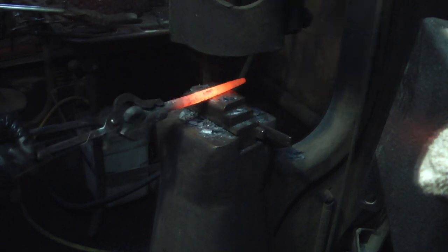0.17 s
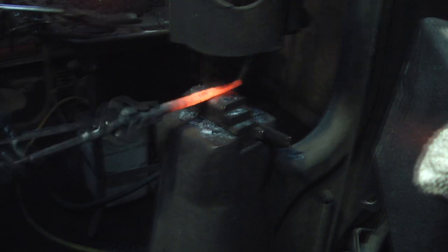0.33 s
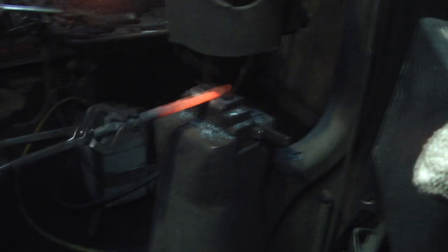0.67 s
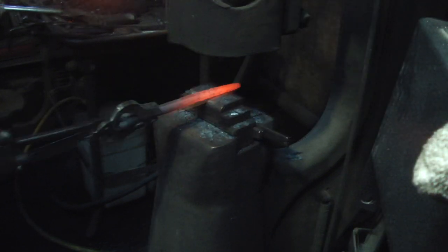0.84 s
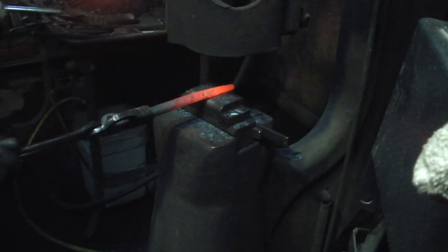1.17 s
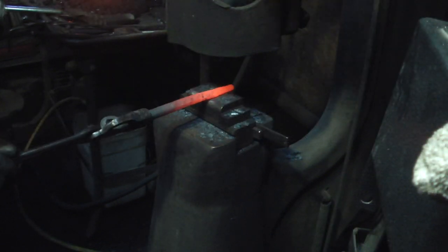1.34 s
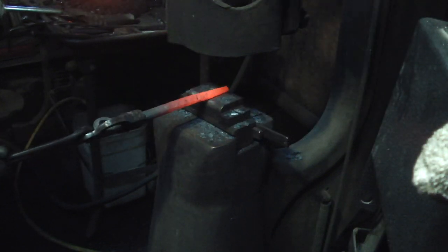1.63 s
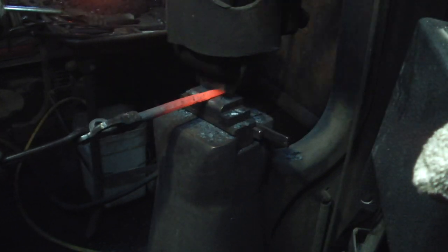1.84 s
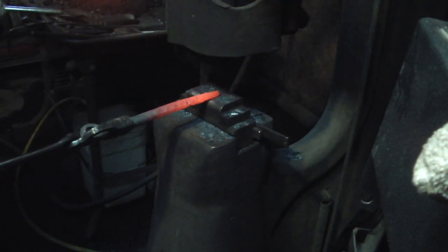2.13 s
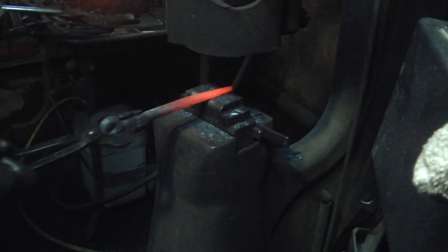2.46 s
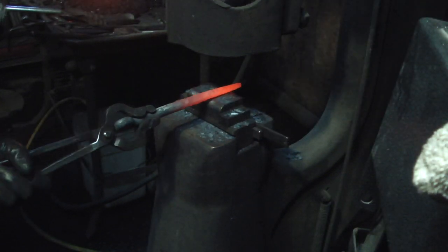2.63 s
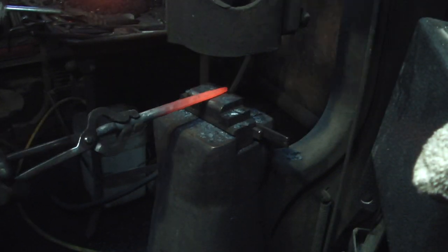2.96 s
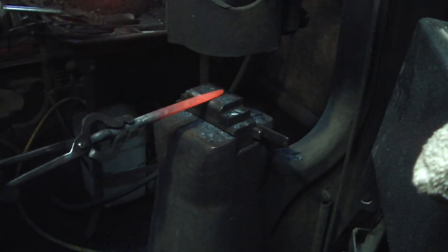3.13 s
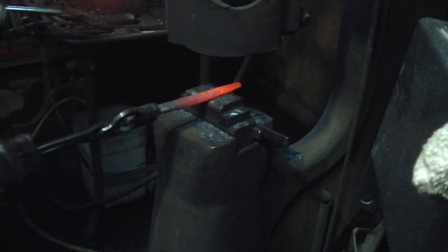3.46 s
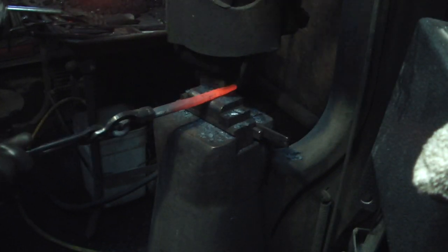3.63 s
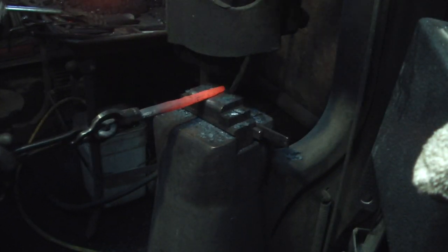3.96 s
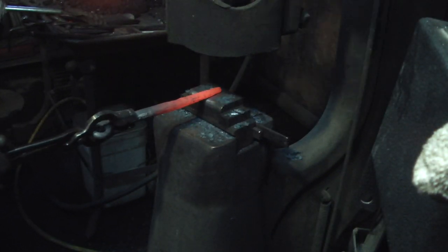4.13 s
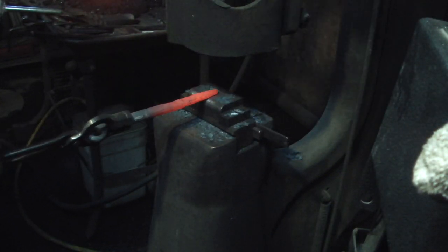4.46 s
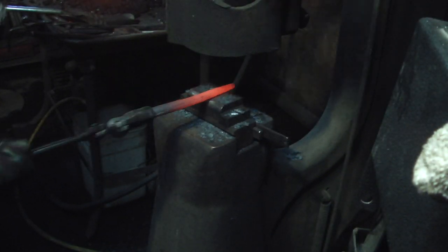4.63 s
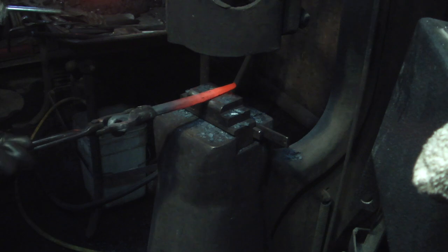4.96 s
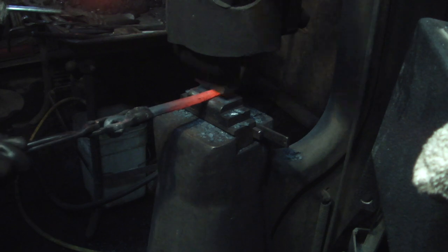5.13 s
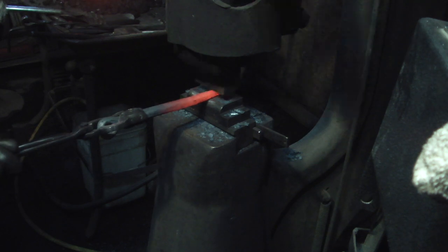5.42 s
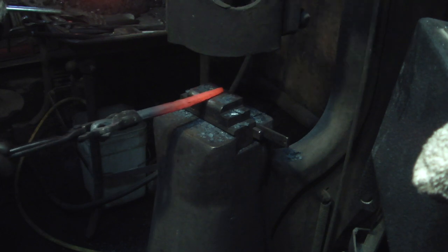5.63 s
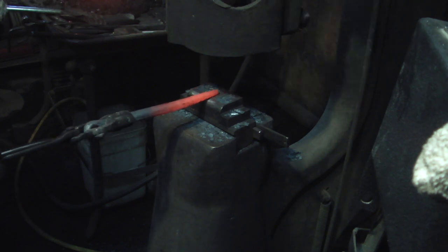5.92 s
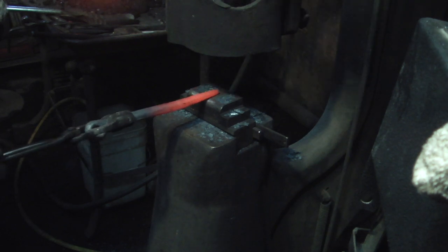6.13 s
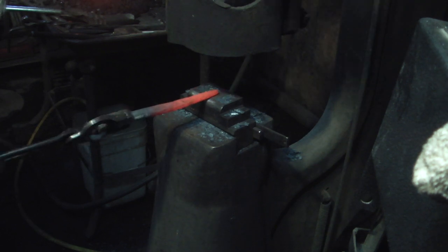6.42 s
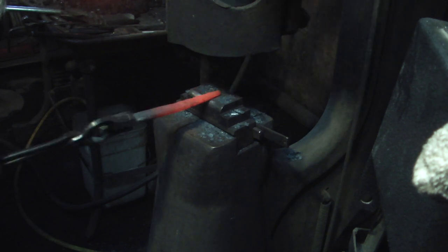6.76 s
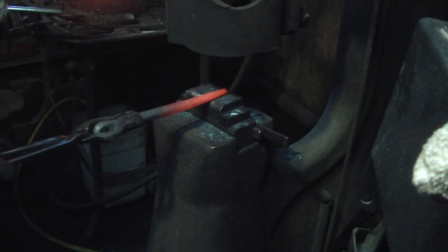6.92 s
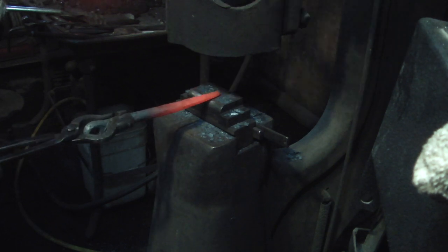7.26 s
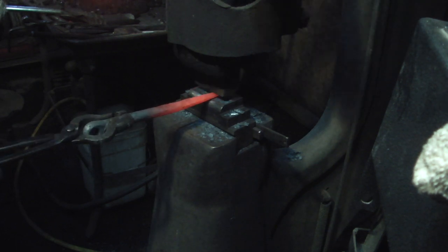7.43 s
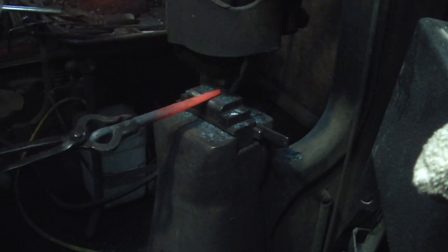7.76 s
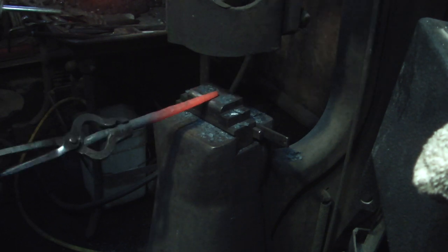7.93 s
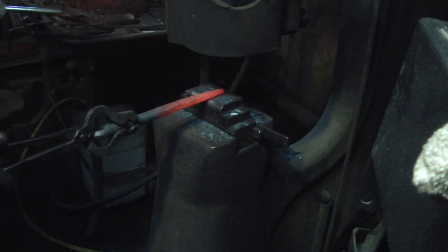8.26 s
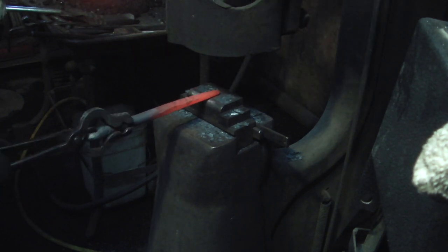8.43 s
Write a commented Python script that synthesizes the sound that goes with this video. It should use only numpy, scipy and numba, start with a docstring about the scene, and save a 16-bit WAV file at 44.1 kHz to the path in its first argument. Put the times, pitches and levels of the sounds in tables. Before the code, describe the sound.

A power hammer pounds hot steel in a fast, steady run of heavy metallic blows, loose parts clanking and rattling between them in a workshop.

```python
"""Power hammer in a workshop

A power hammer forges a hot steel bar, heard close by through a small camera's two microphone ports.
Each blow is a crack, then boom, clang and hiss shaped from noise, with a pressure pulse, wall echoes and a slab swing.
Between blows resonant noise and short sines make the clanks of loose dies, linkage and tongs; small ticks rattle.
Steady coloured noise is the workshop. A fast limiter flattens the first part of every blow.
"""
import sys
import numpy as np
from scipy import signal
from scipy.fft import rfft, irfft, next_fast_len
from scipy.io import wavfile
from scipy.ndimage import uniform_filter1d, map_coordinates
from numba import njit

SR = 44100
rng = np.random.default_rng(int(sys.argv[2]) if len(sys.argv) > 2 else 0)


def to_wav(s):
    """Save 16-bit WAV."""
    ch = np.atleast_2d(s).T  # columns
    pcm = np.round(np.clip(ch, -1, 1) * 32767)  # PCM
    wavfile.write(sys.argv[1], SR, pcm.astype(np.int16))


N = 378819


def amp(db):
    """Decibel law: the amplitude gain of a level in dB."""
    return 10 ** (np.asarray(db) / 20)


def unit(x):
    """Normalisation: the signal scaled to rms 1."""
    return x / np.sqrt(np.mean(x ** 2) + 1e-20)


def along(points, hz):
    """Spectral envelope: (Hz, value) points interpolated on a logarithmic frequency axis."""
    point_hz, value = np.transpose(points)
    return np.interp(np.log(hz + 1), np.log(point_hz + 1), value)


def peak(hz, centre_hz, width_hz):
    """Resonance curve: the gain of one mode, 1 at its centre."""
    return 1 / np.sqrt(1 + (2 * (hz - centre_hz) / width_hz) ** 2)


def fading(t, t60, rise=0.00049):
    """Exponential damping: 60 dB of decay in t60 seconds, after a short rise (time constant in s)."""
    return amp(-60 * t / t60) * (1 - np.exp(-t / rise))


def shaped_noise(size, gain):
    """Filtered noise: fresh white noise multiplied by a spectral gain."""
    return irfft(rfft(rng.standard_normal(size)) * gain, size)


def chatter(size, depth_db):
    """Repeated impact: bouncing parts give an uneven level, with about a hundred lumps a second."""
    knots = rng.standard_normal(size=64)
    return amp(depth_db * map_coordinates(knots, [np.arange(size) * 110 / SR], mode="mirror"))


def bands(size, gain, low_hz, high_hz):
    """Broadband excitation: noise with random spectral humps, split into low, middle and high parts of rms 1."""
    hz = np.fft.rfftfreq(size, 1 / SR)
    low = 1 / (1 + (hz / low_hz) ** 4)
    high = 1 / (1 + (high_hz / (hz + 1)) ** 6)
    middle = (1 - low) * (1 - high)
    humps = np.interp(np.sqrt(hz / hz[-1]), np.linspace(0, 1, num=40), rng.standard_normal(size=40))
    spectrum = rfft(rng.standard_normal(size)) * gain(hz) * amp(1.72 * humps)
    return [unit(irfft(spectrum * part, size) * chatter(size, depth_db=2.0)) for part in (low, middle, high)]


# Steady workshop spectrum of motor, forge and lingering echo: frequency_hz [Hz], density_db [relative dB per Hz]
SHOP_SPECTRUM = [(15, -61), (25, -19), (217, 7), (545, 1), (962, 7.5), (2410, 9), (3720, 3.5), (4490, 2),
                 (5280, 1), (12500, -7.5), (16000, -97)]


def shop():
    """Stationary noise: a fixed spectral envelope gives the steady background of the workshop."""
    size = next_fast_len(N)
    hz = np.fft.rfftfreq(size, 1 / SR)
    noise = shaped_noise(size, amp(along(SHOP_SPECTRUM, hz)))[:N]
    return amp(-39) * unit(noise)


def rattle(machine, count=1800):
    """Driven vibration: small ticks of shaken metal and scale follow the machine's momentary rms."""
    when, pitch, strength, phase = rng.random((count, 4)).T[:, :, None]
    start, step = (when * N).astype(int), np.arange(300)
    shake = np.sqrt(np.abs(uniform_filter1d(machine ** 2, size=400)))[start]
    cycles = 1500 * 8.5 ** pitch * step / SR  # pitches from 1500 to 12750 Hz
    envelope = amp(-60 * cycles / 22) * (1 - np.exp(-cycles))  # 60 dB of decay in 22 cycles
    ticks = shake * amp(-8.0 + 18.8 * strength) * envelope * np.sin(2 * np.pi * (cycles + phase))
    return np.bincount((start + step).ravel(), ticks.ravel(), N + 300)[:N]


# Resonances of frame and room: centre_hz [Hz], width_hz [Hz], level_db [mean dB]
FRAME_MODES = [(319.4, 7.6, 9), (432, 8.7, 2), (480, 21, -1), (949, 44, 2.5), (1179, 10.2, 7),
               (1438, 31, 0), (1711, 76, -0.5), (2040, 16, 4), (2334, 25.6, 7.5), (2477, 28, -1),
               (2570, 26, 2), (3226, 99, -3.5)]


def frame(hz):
    """Modal resonance: the frame lifts its modes out of any contact, each time in new proportions."""
    return 1 + sum(amp(db + rng.normal(0, 4.0)) * peak(hz, centre, width) ** 2
                   for centre, width, db in FRAME_MODES)


# Rough modes of the loose die: centre_hz [Hz], width_hz [Hz], level_db [mean relative dB]
DIE_MODES = [(3392, 81, -7), (4200, 500, -12), (4484, 36, 3.5), (4620, 420, -7.5), (12430, 350, -20)]


def die(size):
    """Modal ringing: the loose die chatters in rough modes of new strength and pitch at every contact; rms 1."""
    hz = np.fft.rfftfreq(size, 1 / SR) * rng.normal(1, .008)
    modes = sum(amp(db + rng.normal(0, 3)) * peak(hz, centre, width) ** 2 for centre, width, db in DIE_MODES)
    return unit(shaped_noise(size, modes))


# Clanks of linkage and tongs: start_s [s], level_db [relative dB], pitch_hz [Hz]
CLANK_EVENTS = [(0.038, -24.5, 3500), (0.0998, -25, 9150), (0.107, -27, 4500), (0.1316, -27, 9300),
                (0.197, -28, 5000), (0.2039, -18.5, 12300), (0.293, -29, 8800), (0.3345, -30, 9600),
                (0.3663, -25.5, 2470), (0.389, -22, 3930), (0.418, -27, 7200), (0.4292, -28.5, 10800),
                (0.522, -36, 9000), (0.5646, -30.5, 9700), (0.577, -30, 8000), (0.641, -26.5, 5000),
                (0.6605, -28.5, 11350), (0.6855, -22, 3800), (0.873, -26.5, 11260), (0.896, -19, 4060),
                (0.932, -23, 4850), (0.992, -27.5, 8400), (1.006, -18.5, 4430), (1.1866, -27, 11300),
                (1.1998, -33, 7670), (1.216, -18, 4050), (1.243, -28, 2340), (1.2473, -21, 5000),
                (1.298, -20, 6200), (1.4687, -15, 4170), (1.52, -25, 7870), (1.559, -28, 8100),
                (1.575, -20.5, 1560), (1.599, -25.5, 9500), (1.75, -18, 3740), (1.737, -37, 9000),
                (1.788, -20.5, 4900), (1.8228, -27, 5700), (1.8457, -30, 9600), (2.0162, -23.5, 11100),
                (2.0555, -15.5, 4200), (2.1083, -23, 2270), (2.1293, -24, 7760), (2.2878, -16.5, 2450),
                (2.321, -26, 2660), (2.351, -23.5, 2600), (2.3967, -20, 4200), (2.4124, -17, 3380),
                (2.5848, -15, 4840), (2.644, -24, 2400), (2.659, -35, 8900), (2.7319, -20, 2620),
                (2.8872, -30, 6160), (2.9248, -21.5, 5000), (2.9584, -29, 8030), (2.977, -25, 5070),
                (3.0308, -31.5, 8500), (3.0552, -23.5, 2380), (3.1068, -19, 4700), (3.156, -29, 7870),
                (3.2304, -28.5, 9400), (3.2653, -18, 4060), (3.314, -16, 4040), (3.3403, -18.5, 3320),
                (3.3842, -19.5, 2540), (3.4949, -28, 9000), (3.5174, -21, 4030), (3.537, -23, 10300),
                (3.575, -18.5, 2420), (3.6404, -20, 3000), (3.66, -26, 3500), (3.8048, -17.5, 4870),
                (3.848, -20.5, 4930), (3.8662, -38, 7760), (3.9421, -19.5, 6100), (4.115, -27, 4600),
                (4.165, -28, 9000), (4.2334, -20, 3320), (4.2532, -19.5, 4800), (4.348, -29, 4800),
                (4.428, -18, 4200), (4.4668, -26, 8100), (4.4835, -24.5, 3340), (4.5439, -26, 2950),
                (4.703, -26.5, 7000), (4.7714, -26, 7900), (4.8064, -28, 4900), (4.845, -32, 8900),
                (4.8702, -24, 3400), (4.9443, -24, 2610), (4.9644, -25, 2600), (5.0535, -25, 11090),
                (5.07, -21.5, 4000), (5.1142, -27, 1870), (5.1507, -26, 7000), (5.157, -22, 9500),
                (5.3272, -17, 3340), (5.378, -29.5, 8300), (5.4415, -28, 6330), (5.4488, -22, 3940),
                (5.4562, -24.5, 8100), (5.616, -31, 10000), (5.623, -19.5, 4620), (5.677, -30.5, 8450),
                (5.754, -27, 7850), (5.8123, -29, 2506), (5.9668, -28, 11500), (5.979, -17.5, 4070),
                (5.9958, -18.5, 3970), (6.0177, -28, 4930), (6.0566, -25, 7800), (6.077, -29, 9700),
                (6.119, -23, 5970), (6.2495, -26, 8870), (6.2858, -18, 4340), (6.3445, -32, 10000),
                (6.3606, -27, 10200), (6.394, -24, 3000), (6.5092, -32.5, 9000), (6.5301, -28, 2160),
                (6.585, -30.5, 7900), (6.6585, -22.5, 4700), (6.7267, -24, 2370), (6.7397, -27, 7500),
                (6.7871, -17, 4900), (6.8948, -23.5, 4300), (6.9646, -30.5, 8100), (6.928, -33, 3000),
                (7.0003, -33, 5000), (7.034, -26, 4000), (7.112, -31, 2370), (7.1169, -19.5, 2450),
                (7.1833, -24, 3020), (7.2955, -28, 11400), (7.3368, -28, 8140), (7.3513, -29, 3480),
                (7.4154, -34, 8300), (7.4267, -28, 3600), (7.4454, -27.5, 2410), (7.5243, -27, 4500),
                (7.6273, -27.5, 10000), (7.637, -20.5, 4000), (7.687, -22, 5040), (7.717, -29.5, 8000),
                (7.789, -23, 3500), (7.8786, -28, 6960), (7.9258, -26, 9200), (7.941, -16, 3740),
                (7.987, -24, 3500), (8.022, -29, 7940), (8.03, -26.5, 10100), (8.035, -22.5, 2960),
                (8.1979, -21, 11840), (8.2514, -22, 1550), (8.326, -20, 2340), (8.3965, -20, 1487),
                (8.4144, -21.5, 3300), (8.487, -31, 9200), (8.5105, -22.5, 4840), (8.549, -30, 8900)]
# The loose die drops back on its seat, about 0.1 s after a blow: start_s [s], level_db [relative dB]
DIE_DROPS = [(0.0747, -33), (0.2932, -28.5), (0.5518, -31), (0.871, -26.5), (1.1618, -26), (1.454, -23),
             (1.7358, -26), (1.9834, -23), (2.2682, -22.5), (2.5662, -23.5), (2.9012, -26.5), (3.2293, -31),
             (3.4938, -24.5), (3.7832, -22), (4.097, -21), (4.407, -25.5), (4.7866, -20.5), (5.0265, -26.5),
             (5.3056, -24), (5.5972, -26), (6.2239, -23), (6.5093, -31), (6.8764, -27), (7.2728, -23.5),
             (7.6261, -29.5), (7.8954, -29.5), (8.1797, -26), (8.4858, -22.5)]
# Noise spectrum of a contact: frequency_hz [Hz], density_db [relative dB per Hz]
CLANK_SPECTRUM = [(180, -28), (300, -18), (326, -24), (546, -20.5), (1170, -7), (1300, -14), (1390, -8),
                  (2480, -5.5), (5610, -6), (7950, -2), (16000, -14)]
# Low clanks have more body: pitch_hz [Hz], body_db [relative dB]
CLANK_BODY = [(2400, -3), (4200, -8), (9000, -5)]
# High clanks have more edge: pitch_hz [Hz], edge_db [relative dB]
CLANK_EDGE = [(2400, -5.5), (4400, -8), (8000, 2)]
# How strongly a clank sets the die ringing: pitch_hz [Hz], ring_db [relative dB]
CLANK_RING = [(2400, -5.5), (4400, -7.5), (9000, -5)]


def clanks():
    """Impact excitation: each contact gives a pitched clink, a tick, a fading body and edge, and the die's ring."""
    size = 8192
    out, t = np.zeros(N + size), np.arange(size) / SR
    hz = np.fft.rfftfreq(size, 1 / SR)
    # start s, level dB, pitch Hz, then body, edge and ring dB
    contacts = [(s, db, 2359, -4.5, -5.5, 2.5) for s, db in DIE_DROPS]
    for s, db, pitch_hz in CLANK_EVENTS:
        parts_db = [along(table, pitch_hz) for table in (CLANK_BODY, CLANK_EDGE, CLANK_RING)]
        contacts.append((s, db, pitch_hz, *parts_db))
    for s, db, pitch_hz, body_db, edge_db, ring_db in contacts:
        body, tick, edge = bands(size, lambda f: amp(along(CLANK_SPECTRUM, f)) * frame(f),
                                 low_hz=2510, high_hz=4960)
        clink = unit(shaped_noise(size, peak(hz, pitch_hz, 0.14 * pitch_hz) ** 2))
        clink_db = body_db if pitch_hz < 2500 else edge_db if pitch_hz > 6000 else 0
        first_touch = np.sin(2 * np.pi * pitch_hz * t) * fading(t, 0.014, rise=0.00023)
        sound = 0.58 * amp(clink_db) * clink * fading(t, 0.084, rise=0.00047)
        sound += 1.9 * amp(clink_db) * first_touch
        sound += tick * (1.57 * fading(t, 0.0092) + 0.38 * fading(t, 0.24, rise=0.0067))
        sound += amp(body_db) * body * (0.38 * fading(t, 0.085) + 0.95 * fading(t, 0.3, rise=0.0037))
        sound += amp(edge_db) * edge * (1.36 * fading(t, 0.022) + 0.67 * fading(t, 0.19, rise=0.0028))
        sound += amp(ring_db) * die(size) * (0.68 * fading(t, 0.061) + 0.87 * fading(t, 0.22))
        out[round(s * SR):][:size] += amp(db - 5.0) * sound
    return out[:N]


# Floor and walls return the pulse of a blow: delay_s [s], level_db [dB re the smoothed pulse]
WALL_ECHOES = [(.0042, -4), (.0068, -11.5), (0.0125, -11.5), (.0177, -13.5), (0.0246, -6.5), (.0279, -1.5),
               (.0295, -15), (.0322, -8.5), (0.046, -3.5), (0.0474, -10), (.0503, -12), (.0637, -26),
               (0.067, -15.5), (.0807, -9)]


def pressure_pulse(t):
    """Reflection: the closing dies push out one short pulse, which floor and walls return alike at every blow."""
    push = -np.sin(2 * np.pi * 520 * t) * fading(t, 0.0038, rise=0.00018)
    dull = uniform_filter1d(push, size=24)  # echoes lose treble
    push = push + sum(amp(db) * np.roll(dull, round(s * SR)) for s, db in WALL_ECHOES)
    return push - uniform_filter1d(push, size=140)  # the air swings back: no lasting pressure


# Hammer blows: start_s [s], clang_db [relative dB], then boom_db, hiss_db, crack_db [relative dB above the clang]
HAMMER_BLOWS = [(0.004, -31, -9.5, -2, 6), (0.179, -28, -12, -5.5, 3), (0.436, -33.5, -9.5, -1.5, -7),
                (0.741, -28.5, -8, -6, 8), (1.044, -27.5, -7, -3.5, 11), (1.347, -26, -11, -4.5, 6),
                (1.619, -28.5, -6, -6, 16), (1.891, -27, -9, -4, 9), (2.157, -26.5, -7.5, -5, 12.5),
                (2.446, -29.5, -5, -2, 14), (2.784, -27.5, -12, -5, 14), (3.124, -28, -7, -7, 13),
                (3.397, -26.5, -11, -6.5, 5), (3.667, -24, -13.5, -8.5, 11), (3.975, -26, -9, -7, 13),
                (4.289, -27.5, -6, -5.5, 13), (4.613, -27, -7, -6.5, 14), (4.917, -26, -10.5, -5.5, 12),
                (5.202, -26, -10, -6, 6), (5.489, -26.5, -11.5, -6, 16), (5.83, -26, -9, -4.5, 14),
                (6.126, -27, -8.5, -6.5, 10), (6.402, -28.5, -5, -3.5, 6), (6.757, -32.5, -2.5, -6, 20.5),
                (7.155, -26.5, -8, -6, 5), (7.489, -28, -5.5, -6.5, 10), (7.794, -27, -7.5, -7, 10.5),
                (8.081, -28.5, -7.5, -4.5, 8), (8.37, -29.5, -2.5, -4, 8)]
# Noise spectrum of a blow: frequency_hz [Hz], density_db [relative dB per Hz]
BLOW_SPECTRUM = [(18, -61), (30, -28), (437, -11), (721, -7), (1320, -5), (1460, -1), (1910, -5.5),
                 (2540, -2.5), (4190, -3), (4530, 0), (5170, -2), (12300, -6), (16000, -18)]


def hammer():
    """Impact and damping: a hard crack, then a shudder of boom, clang and hiss that holds briefly and dies."""
    size = 16384
    out, t = np.zeros(N + size), np.arange(size) / SR
    shudder = 1 / (1 + (t / 0.096) ** 5) + 0.2  # the machine shakes for a moment, then settles
    shudder = shudder * (1 - 0.19 * np.exp(-((t - .017) / 0.019) ** 2))  # a brief dip just after the crack
    push = pressure_pulse(t)
    slab = amp(-16.5) * np.sin(2 * np.pi * 63.2 * t) * fading(t, 0.53, rise=0.06)  # the foundation swings
    for s, db, boom_db, hiss_db, crack_db in HAMMER_BLOWS:
        boom, clang, hiss = bands(size, lambda hz: amp(along(BLOW_SPECTRUM, hz)) * frame(hz),
                                  low_hz=756, high_hz=5400)
        crack = amp(crack_db - 6.5)
        ring_db = -5 - 0.21 * boom_db  # a blow with less boom rings the die more
        sound = amp(boom_db) * (boom * shudder * fading(t, 1.0, rise=0.0021) * 0.6 + 12 * push + slab)
        sound += clang * (shudder * fading(t, 0.51, rise=0.029) + crack * fading(t, 0.045))
        sound += amp(ring_db) * die(size) * shudder * fading(t, 0.26)
        hiss_envelope = shudder * fading(t, 0.38, rise=0.00074) + 0.83 * crack * fading(t, 0.024)
        sound += amp(hiss_db) * hiss * hiss_envelope
        out[round(s * SR):][:size] += amp(db + 5.5) * sound
    return out[:N]


# Difference between the two microphone ports: frequency_hz [Hz], level_db [dB re their sum]
PORT_DIFFERENCE = [(60, -37), (700, -27.5), (1300, -106), (9000, -123), (12000, -17), (15000, 0.5)]


def port_difference(both):
    """Decorrelation: the small difference of the ports follows the sound's spectrum with random phases."""
    hz, _, z = signal.stft(both, SR, nperseg=256)
    z = z * amp(along(PORT_DIFFERENCE, hz))[:, None] * np.exp(2j * np.pi * rng.random(z.shape))
    return signal.istft(z, SR, nperseg=256)[1][:N]


def scene():
    """Superposition: machine, rattle and workshop add up and reach both ports nearly alike."""
    machine = hammer() + clanks()
    both = machine + rattle(machine) + shop()
    apart = port_difference(both)
    return np.array([both + apart, both - apart]) * amp([[-.08], [.08]])


@njit
def follow(power, up, down):
    """Envelope following: a running power that rises fast and falls more slowly."""
    out, level = np.empty_like(power), power[0]
    for i in range(len(power)):
        level += (up if power[i] > level else down) * (power[i] - level)
        out[i] = level
    return out


def record(dry):
    """Dynamic compression: a slightly delayed limiter, rounded peaks, then a bass cut and a band limit."""
    power = np.abs(uniform_filter1d(np.mean(dry ** 2, axis=0), size=64, origin=31))  # mean of the last 64 samples
    level = follow(power, up=1 / (0.0006 * SR), down=1 / (0.0022 * SR))  # time constants in s
    knee_db, squeeze = -24, .6
    held = dry * (1 + (level / amp(knee_db) ** 2) ** 2) ** (-squeeze / 4)
    held = held / (1 + np.abs(held / .4) ** 4) ** (1 / 4)  # the highest peaks round off
    size = next_fast_len(N + 4096)
    hz = np.fft.rfftfreq(size, 1 / SR)
    bass_cut = (1j * hz / (40 + 1j * hz)) ** 2
    top_hz = 15900
    return irfft(rfft(held, size) * bass_cut * (hz < top_hz), size)[:, :N]


dry = scene()
out = record(dry)
to_wav(out)
```